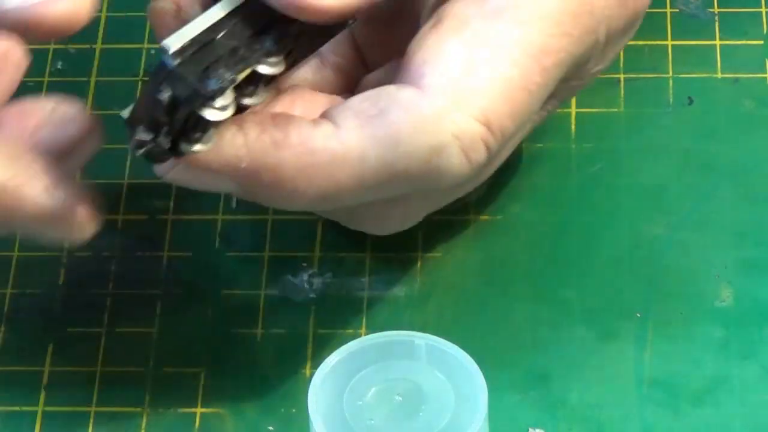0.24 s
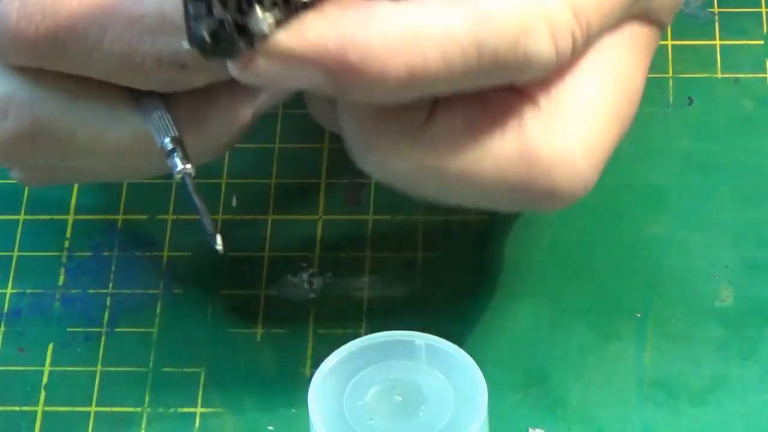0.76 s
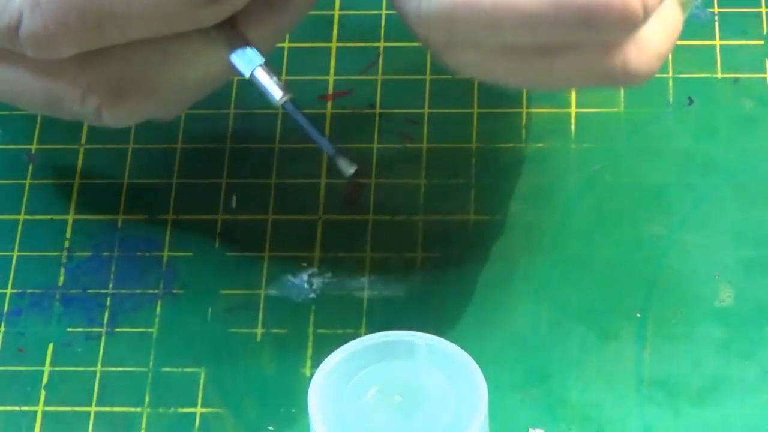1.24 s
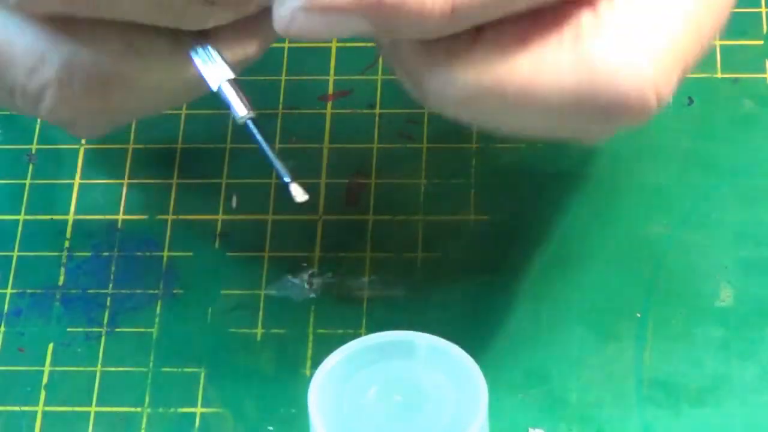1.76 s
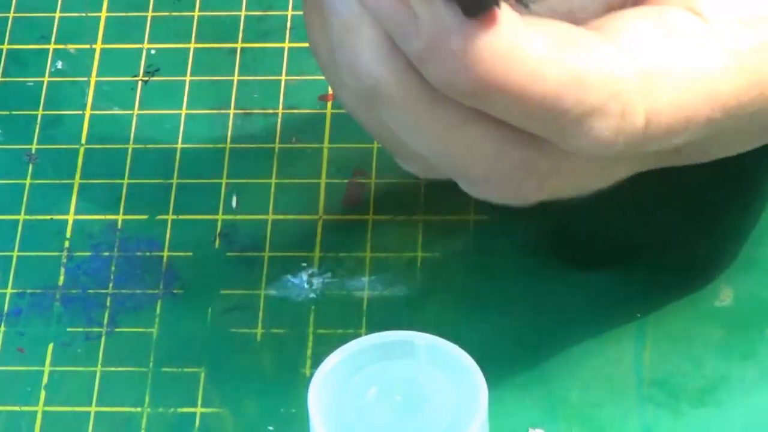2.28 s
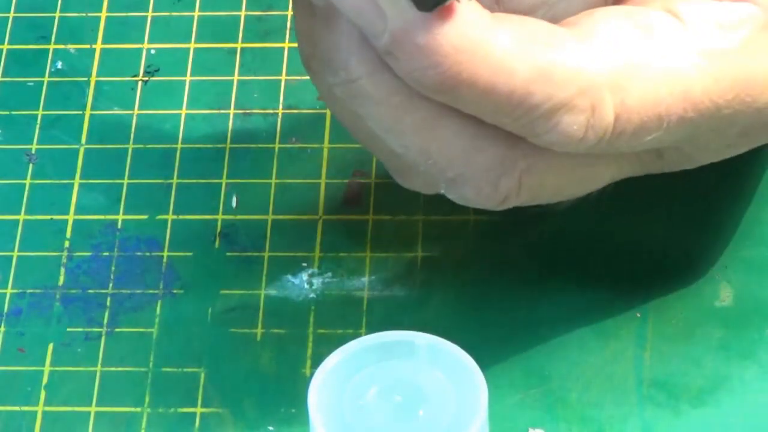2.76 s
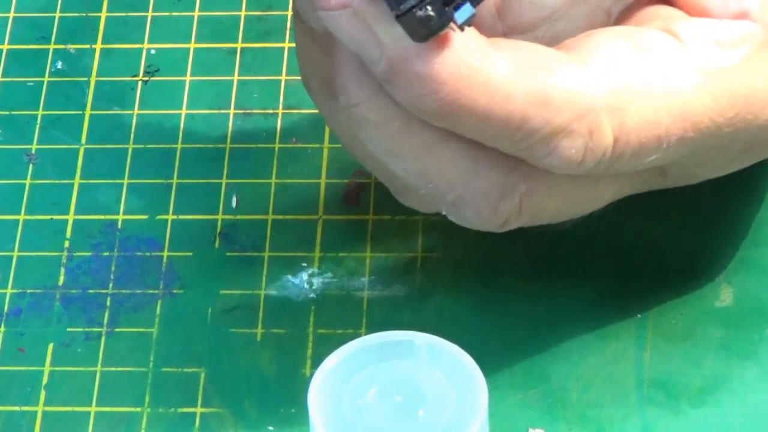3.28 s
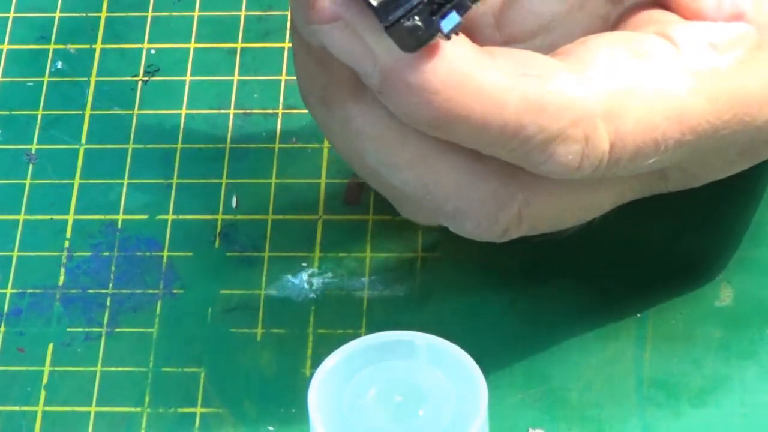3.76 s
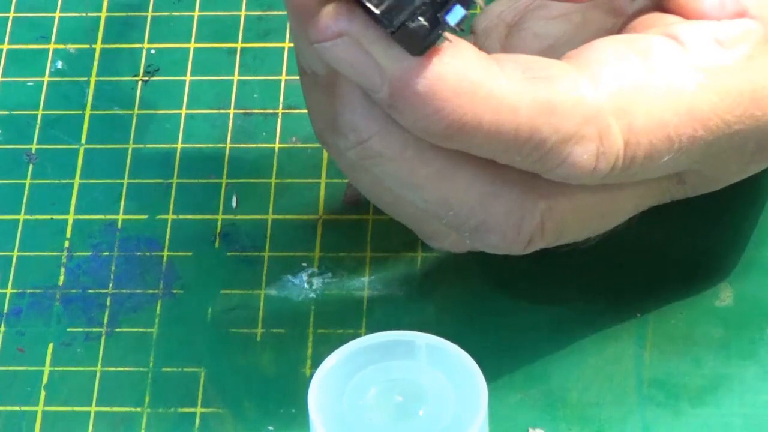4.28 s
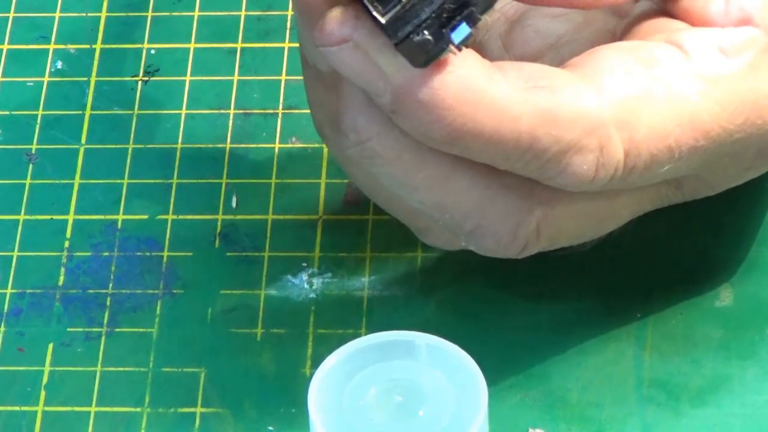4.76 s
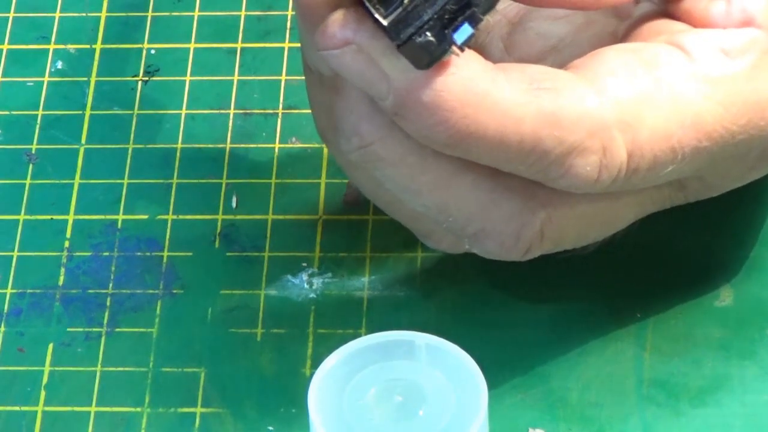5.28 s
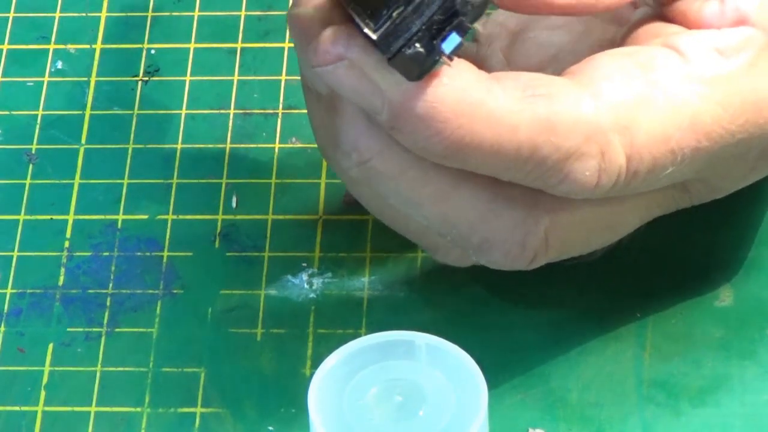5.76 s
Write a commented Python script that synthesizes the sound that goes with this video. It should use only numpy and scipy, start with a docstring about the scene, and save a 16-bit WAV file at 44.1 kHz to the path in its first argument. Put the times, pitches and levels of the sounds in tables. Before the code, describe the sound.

Fingers and a small screwdriver tick and rub on a tiny part over rumbling hiss that stops midway; later a crisp snap and faint clicks.

```python
"""A workbench in a room: fingers turn a small plastic and metal part while a screwdriver tip ticks and snaps on it.
For the first three seconds something rolls on the bench: noise through resonances gives hiss and rumble, and
a low drone beats against the mains hum. Jolts, rubs and slides are bursts of filtered noise, squeaks are wavering
tones, and touches and blade pings ring decaying modes with a short echo.
Mains tones, room hiss and a camera's mechanism, ticking 25 times a second, lie underneath."""
import sys
import numpy as np
from scipy import signal
from scipy.fft import rfft, irfft
from scipy.io import wavfile
from scipy.ndimage import uniform_filter1d

SR = 44100
rng = np.random.default_rng(int(sys.argv[2]) if len(sys.argv) > 2 else 0)


def dump(signal):
    """Clip the signal to [-1, 1] and save it as 16-bit WAV at the path in sys.argv[1]."""
    limited = np.clip(np.atleast_2d(signal).T, -1, 1)
    pcm = np.round(limited * 32767).astype(np.int16)
    wavfile.write(sys.argv[1], SR, pcm)


def volts_from_decibels(level):
    """Turn decibel levels (scalar or array-like) into linear amplitude factors."""
    exponent = np.asarray(level, float) / 20
    return 10 ** exponent


N = 265916

ROLL_END_S = 3.215
# how alike left and right are in the rolling: (frequency [Hz], likeness [0-1])
ROLL_LIKENESS = [(60, 0.98), (180, 1), (550, 0.95), (1650, 0.58), (4970, 0.75), (15000, 1)]
# stereo balance of the rolling: (frequency [Hz], left over right [dB])
ROLL_BALANCE = [(60, 0.5), (180, -0.5), (550, -1.0), (1650, -4.5), (4970, -1.5), (15000, 0.5)]


def rms_one(x):
    """Scale to unit rms."""
    return x / np.sqrt(np.mean(x ** 2) + 1e-20)


def in_time(rows):
    """Turn the columns of a table, after its time column, into sample-rate curves."""
    s, *columns = np.transpose(rows)
    return [np.interp(np.arange(N) / SR, s, column) for column in columns]


def at_hz(points, hz):
    """Read a spectrum along a logarithmic frequency axis."""
    points = np.array(points, float)
    return np.interp(np.log(hz), np.log(points[:, 0]), points[:, 1])


def drift(rate_hz):
    """Slow random curve of unit rms: noise through two equal low-pass poles at rate_hz."""
    # computed at every 40th sample, past the filter's start
    r = np.exp(-80 * np.pi * rate_hz / SR)
    slow = signal.lfilter([1], [1, -2 * r, r * r], rng.standard_normal(N // 40 + 2002))[2000:]
    return np.interp(np.arange(N) / 40, np.arange(len(slow)), rms_one(slow))


def resonate(x, hz, width_hz):
    """Two-pole resonance with a gain of 1 at its top."""
    r = np.exp(-np.pi * width_hz / SR)
    zeros = np.array([1, 0, -1]) * (1 - r * r) / 2
    return signal.lfilter(zeros, [1, -2 * r * np.cos(2 * np.pi * hz / SR), r * r], x)


def pair(white, hz, likeness, balance):
    """Left and right mixed from a shared noise and one of opposite sign in the two channels."""
    alike = np.clip(at_hz(likeness, hz), 0, 1)
    both = np.sqrt(1 + alike) * white[0] + np.sqrt(1 - alike) * white[1] * [[1], [-1]]
    return both * volts_from_decibels(at_hz(balance, hz) * np.array([[.5], [-.5]])) / np.sqrt(1 + alike)


def coloured(spectrum, likeness, balance):
    """Stereo noise shaped bin by bin; the mid has unit rms."""
    hz = np.maximum(np.fft.rfftfreq(N, 1 / SR), 1)
    white = rfft(rng.standard_normal((2, N))) * volts_from_decibels(at_hz(spectrum, hz))
    out = irfft(pair(white, hz, likeness, balance), N)
    return out / np.std(out.mean(axis=0))


def humming(modes, flicker_db, rate_hz):
    """Noise in narrow resonances, each swelling by itself."""
    out = 0
    # the deepest modes grow by 3 dB per second
    growth_db = 3 * (np.arange(N) / SR - ROLL_END_S / 2)
    for hz, width_hz, level_db in modes:
        band = resonate(rng.standard_normal((2, N)), hz, width_hz)
        band = resonate(band, hz, 2 * width_hz)
        band = pair(rms_one(band), hz, ROLL_LIKENESS, ROLL_BALANCE)
        out = out + band * volts_from_decibels(level_db + flicker_db * drift(rate_hz) + growth_db * (hz < 130))
    return out


def rolling():
    """Surface roughness drives a hiss with wheel resonances and a rumble in the bench top, which dies later."""
    # gains while rolling: (time [s], rumble gain [dB], hiss gain [dB])
    roll_gains = [(0.0, -54, -50), (0.52, -47.5, -47.5), (1.12, -49, -48), (1.43, -48.5, -46.5),
                  (1.75, -45.5, -43.5), (2.09, -47, -45), (2.3, -49, -48), (2.6, -53, -47.5),
                  (3.18, -54.5, -51.5)]
    # the two loudest groups of bench modes swell apart:
    # (time [s], lower group gain [dB], upper group gain [dB])
    bench_swell = [(0, -53.5, -51.5), (0.3, -53.5, -56.5), (0.7, -58, -55), (0.85, -59, -49),
                   (1.05, -56.5, -51), (1.3, -56.5, -55), (1.45, -52, -48.5), (1.7, -52, -49.5),
                   (1.85, -59, -47), (2.1, -58.5, -51.5), (2.45, -65, -52), (2.7, -61, -54.5),
                   (3.0, -61, -56), (3.2, -62, -55)]
    # noise spectra: (frequency [Hz], relative level [dB])
    hiss_spectrum = [(410, -11.5), (700, 0.5), (850, -3.5), (1050, 0.5), (1520, -3), (2080, -0.5),
                     (2590, 0.5), (4410, 1.5), (5360, 0), (6340, -1), (9470, -8), (11700, -11.5),
                     (15500, -19)]
    rumble_spectrum = [(35, -26), (60, -4), (75, -13), (145, -3), (277, -2.5), (456, -8.5), (511, -14),
                       (900, -12.5), (1170, -22), (1980, -120)]
    # resonances of bench and wheel: (frequency [Hz], width [Hz], relative level [dB])
    bench_modes = [(73.7, 5.3, -13.5), (104.4, 14.5, -11), (150, 25, -18.5), (379, 24, -15.5),
                   (518, 19, -14), (608, 30, -17), (732, 21, -20)]
    lower_modes = [(199.2, 14.7, -2), (224.6, 27, -8)]
    upper_modes = [(273.4, 18, -3), (312, 22, -6)]
    wheel_modes = [(1060, 51, -19.5), (1405, 15, -21.5), (2070, 110, -18.5), (3237, 40, -18.5),
                   (3550, 220, -14), (3920, 480, -13), (2385, 60, -19), (4420, 150, -14),
                   (6295, 520, -10.5), (6840, 230, -16.5)]
    # phase by which the left leads the right: (frequency [Hz], lead [rad])
    left_lead = [(100, 0.017), (1500, 0.06), (4600, 0.77), (7400, 0.49), (9500, 0.22)]
    hiss_fade_s, rumble_fade_s = 0.02, 0.1   # time constants once the rolling ends

    rumble_db, hiss_db = in_time(roll_gains)
    lower_db, upper_db = in_time(bench_swell)
    after = np.maximum(np.arange(N) / SR - ROLL_END_S, 0)

    hiss = coloured(hiss_spectrum, ROLL_LIKENESS, ROLL_BALANCE) * volts_from_decibels(-2.0 + 1.27 * drift(20.4))
    hiss = volts_from_decibels(hiss_db) * (hiss + humming(wheel_modes, 2.06, 3.7))

    rumble = volts_from_decibels(-7.5) * coloured(rumble_spectrum, ROLL_LIKENESS, ROLL_BALANCE)
    rumble = volts_from_decibels(rumble_db) * (rumble + humming(bench_modes, 1.5, 5.0))
    rumble += volts_from_decibels(lower_db) * humming(lower_modes, .8, 8.0)
    rumble += volts_from_decibels(upper_db) * humming(upper_modes, .8, 8.0)

    out = hiss * np.exp(-after / hiss_fade_s) + rumble * np.exp(-after / rumble_fade_s)
    lead = at_hz(left_lead, np.maximum(np.fft.rfftfreq(N, 1 / SR), 1))
    out[1] = irfft(rfft(out[1]) * np.exp(-1j * lead), N)
    return out


def hum():
    """Mains tones, and a drone that beats just below the first and slides up toward it as it dies."""
    # drone: (time [s], distance below the mains tone [beats per s], rms level [dB])
    drone = [(0, 4.2, -60), (1, 3.6, -62), (2.1, 3.4, -56), (2.5, 2.3, -70), (3.2, 1.3, -55),
             (3.5, 0.69, -112), (6.03, 1.4, -87)]
    # mains tones: (multiple of the mains frequency, rms level [dB])
    mains_tones = [(1, -55), (2, -68)]
    mains_hz, first_beat_s = 50.075, 0.073

    t = np.arange(N) / SR
    beats, drone_db = in_time(drone)
    cycles_behind = np.cumsum(beats) / SR - beats[0] * first_beat_s
    out = volts_from_decibels(drone_db) * np.sin(2 * np.pi * (mains_hz * t - cycles_behind))
    for multiple, level_db in mains_tones:
        out += volts_from_decibels(level_db) * np.sin(2 * np.pi * multiple * mains_hz * t)
    return np.sqrt(2) * out


def room():
    """Steady hiss of air and microphone, with one faint band of noise standing out."""
    # hiss spectrum: (frequency [Hz], relative level [dB])
    hiss_spectrum = [(30, -13), (42, -6.5), (75, -2), (141, -10), (300, -12), (537, -15.5), (955, -20.5),
                     (1450, -20), (1990, -23.5), (2950, -24), (4610, -28), (8000, -30.5), (12000, -29.5),
                     (14600, -29), (15050, -28), (15500, -25)]
    # how alike left and right are: (frequency [Hz], likeness [0-1])
    room_likeness = [(60, 0.97), (150, 0.98), (380, 0.57), (950, 0.08), (2380, 0.28), (5980, 0.77),
                     (15000, 0.8)]
    # faint band: (frequency [Hz], width [Hz], rms level [dB])
    air_band = (1480, 150, -70)
    balance = [(100, 0), (1000, -0.74), (4400, 0.67), (9000, -0.12)]   # (frequency [Hz], left over right [dB])

    hz, width_hz, level_db = air_band
    band = volts_from_decibels(level_db) * rms_one(resonate(rng.standard_normal((2, N)), hz, width_hz))
    return volts_from_decibels(-57.5) * coloured(hiss_spectrum, room_likeness, balance) + band


def camera_ticks():
    """Each tick is a dull knock, then short rings; impulses kick soft-rising resonances, a little unevenly."""
    # parts of a tick: (delay [s], frequency [Hz], level [dB], 60 dB decay [s])
    tick_parts = [(0, 2570, -61.5, 0.0055), (0.0008, 2950, -61.5, 0.008), (0.0027, 3506, -62.5, 0.018),
                  (0.0025, 14300, -72.5, 0.018), (0.0095, 12300, -75, 0.018), (0.0135, 15050, -74, 0.011),
                  (0.025, 15050, -72.5, 0.015)]
    first_s, period_s = .0088, .04
    knock_below_hz, odd_knock_db = 3200, -4   # the knock is softer on every second tick

    starts = np.arange(first_s, N / SR, period_s)
    odd = np.arange(len(starts)) % 2
    out = np.zeros((2, N))
    for delay, hz, level_db, t60 in tick_parts:
        chance = rng.standard_normal((len(starts), 3))
        at = ((starts + delay + .00012 * chance[:, 0]) * SR).astype(int)
        kick_db = level_db + odd_knock_db * (hz < knock_below_hz) * odd
        kick_db = kick_db + 1.1 * (1 + (hz > 9000)) * chance[:, 1]   # the highest rings vary twice as much
        kicks = np.zeros((2, N + SR // 10))
        kicks[:, at] = volts_from_decibels(kick_db + .5 * chance[:, 2] * [[1], [-1]])
        width_hz = np.log(1000) / np.pi / t60
        # a wider resonance first softens the rise
        kicks = resonate(kicks + 1e-18, hz, 2.3 * width_hz) * SR / (3.0 * np.pi * width_hz)
        out += resonate(kicks, hz, width_hz)[:, :N] * 5.85
    return out


def scuffs(rows, octaves, rise=0.19):
    """Bursts of noise round a centre pitch, grainy as the contact catches and slips; rise is a share of length."""
    grain_s, grain_db = 0.0011, 3.5
    top_hz = 8700   # bursts centred high may reach past it
    t = np.arange(round(.2 * SR)) / SR
    out = np.zeros((2, N))
    for s, level_db, hz, length in rows:
        fade = 0.95 * np.exp(-(t / length) ** 3.1) + 0.13 * np.exp(-t / 0.069)
        shape = np.minimum(t / (rise * length), 1) * fade

        grain = rms_one(uniform_filter1d(rng.standard_normal(len(t)), round(grain_s * SR)))
        mid, side = rng.standard_normal((2, len(t))) * volts_from_decibels(grain_db * grain)
        stereo = mid + 0.38 * signal.lfilter([.3], [1, -.7], side) * [[1], [-1]]

        low_hz = hz / 2 ** (octaves / 2)
        high_hz = min(hz * 2 ** (octaves / 2), max(top_hz, 1.3 * hz))
        edges = np.clip([low_hz, high_hz], 30, .45 * SR)
        burst = signal.sosfilt(signal.butter(2, edges, "band", fs=SR, output="sos"), stereo)

        i = round((s - .002) * SR)
        out[:, i:i + len(t)] += (volts_from_decibels(level_db - 7.5) * rms_one(burst) * shape)[:, :N - i]
    return out


def jolts():
    """The rolling thing jolts, fingers brush the part: broad bursts, with a duller thump from the wood under each."""
    # (time [s], burst level [dB], centre [Hz], length [s], thump level [dB])
    jolt_rows = [(0.497, -36, 4860, 0.043, -55), (0.816, -37.5, 2300, 0.026, -45),
                 (0.915, -41, 5900, .019, -62), (1.124, -35, 3820, 0.042, -38.5),
                 (1.313, -46, 5020, 0.048, -62), (1.494, -38.5, 4430, .03, -53),
                 (1.669, -33.5, 4500, 0.028, -41), (1.971, -37, 6000, 0.046, -62),
                 (2.012, -35, 6420, 0.034, -37), (2.256, -39, 4500, 0.019, -62),
                 (2.3, -39.5, 2520, 0.014, -35.5), (2.781, -41.5, 2300, 0.026, -49),
                 (3.082, -40.5, 3480, 0.025, -64), (3.383, -51.5, 6460, 0.044, -50),
                 (4.222, -40, 4500, 0.014, -70), (4.244, -56, 3000, 0.039, -53),
                 (4.328, -51.5, 6400, 0.063, -75)]
    thump_hz = 474
    bursts = [(s, level_db, hz, length) for s, level_db, hz, length, _ in jolt_rows]
    thumps = [(s, thump_db, thump_hz, length) for s, _, _, length, thump_db in jolt_rows]
    return scuffs(bursts, octaves=2.5) + scuffs(thumps, octaves=2.13)


def clicks():
    """Screwdriver and part touch: each touch strikes the modes near its brightest pitch hardest, with a noisy crack."""
    # touches: (time [s], peak level [dB], brightest pitch [Hz], spread [octaves], left over right [dB])
    touches = [(0.497, -32, 6500, .8, 2), (0.4992, -37, 7500, .5, 2), (0.5003, -30, 7700, 0.25, 2),
               (0.5005, -40, 4300, .3, 2), (1.13, -36, 6800, .3, 0), (1.132, -33, 2800, .2, -2),
               (1.387, -26.5, 8850, 0.36, 2), (1.67, -39, 5000, 1.4, 0), (1.674, -39, 6800, .3, 0),
               (1.6845, -34, 5250, .4, 0), (2.017, -35, 8000, .2, 6), (2.072, -31, 11600, 0.29, 6),
               (2.117, -33, 8000, 0.82, 3), (2.864, -33, 8000, 0.59, 5), (3.2947, -35.5, 9500, 1.1, 2),
               (3.301, -44, 10000, 1.0, 3), (3.379, -49, 5300, .4, 0), (3.394, -47, 5200, .4, 0),
               (3.404, -48, 6200, .4, 0), (3.3865, -41, 6560, 0.4, 2), (3.3885, -46, 8400, .3, 0),
               (3.5413, -30, 7500, 1.1, 2.5), (3.544, -37, 6500, 1.6, 2), (3.5485, -44, 9000, .5, 5),
               (3.572, -52, 2800, 0.12, 2), (3.58, -58, 2800, .12, 2), (4.202, -40, 5460, 1.6, .5),
               (4.221, -47, 6900, 0.27, 0), (4.2235, -41, 4300, .5, 0), (4.2262, -36, 4600, 1.1, 0),
               (4.2265, -41, 10000, .3, 0), (4.2293, -35, 3300, 1.0, 0), (4.2372, -38, 7000, 1.2, -3),
               (4.2386, -27, 7000, 1.5, -3), (4.2435, -16.5, 7000, 0.77, 3),
               (4.2434, -23.5, 2100, 1.45, -1), (4.2465, -34, 4000, 1.8, 1), (4.2485, -37, 1900, .8, 0),
               (4.25, -36, 6500, 1.2, 1), (4.256, -43, 2000, 0.37, 0), (4.258, -43, 6500, .5, 1),
               (4.266, -46, 2000, .4, 0), (4.275, -43, 6800, .6, 1), (4.288, -46, 2800, .8, 1),
               (4.5204, -50, 2980, .3, 1), (4.712, -43, 7040, 1.4, -.5), (4.7125, -51, 1970, .3, -.5),
               (5.056, -51, 8300, 0.12, 0), (5.057, -56, 5250, .15, 0), (5.083, -45.5, 8250, 0.15, 3),
               (5.113, -52, 7300, .3, 0), (5.379, -53, 9800, .15, 0), (5.392, -47, 8200, .2, -3),
               (5.548, -54, 8200, 0.15, 0)]
    # modes of the part: (frequency [Hz], relative level [dB], 60 dB decay [s])
    part_modes = [(380, -8, .025), (563, -8, 0.018), (810, -3, 0.017), (1150, -7.5, 0.023),
                  (1340, -8, 0.012), (1610, -6.5, 0.018), (2020, -3, 0.022), (2300, -4, 0.011),
                  (2800, -2.5, 0.013), (3270, -7, 0.0098), (3960, -0.5, 0.0086), (4500, -9, 0.018),
                  (5250, -17, .008), (6200, -1, 0.0093), (6830, 2, 0.0078), (7700, -3, 0.0031),
                  (8220, 0.5, 0.009), (8700, -2.5, 0.0084), (9800, 0.5, 0.01), (10450, 0.5, 0.0066),
                  (12100, -8, 0.0087), (13300, -2, 0.0059)]
    crack_db, crack_t60_s = -5, 0.0088

    t = np.arange(round(.15 * SR)) / SR
    out = np.zeros((2, N))
    hz, level_db, t60 = np.transpose(part_modes)[:, :, None]
    for s, peak_db, bright_hz, octaves, pan_db in touches:
        luck = rng.standard_normal((len(part_modes), 2))
        near_db = -6.0 * (np.log2(hz / bright_hz) / max(octaves, .05)) ** 2
        decay = volts_from_decibels(level_db + near_db + 1.5 * luck[:, :1] - 60 * t / t60)
        modes = decay * np.sin(2 * np.pi * hz * t + 1.7 * luck[:, 1:])
        ring = (modes * np.minimum(t * hz / 1.16, 1)).sum(axis=0)   # each mode builds up over about a cycle

        edges = np.clip([bright_hz / 2 ** (1.07 * octaves), bright_hz * 2 ** (0.34 * octaves)], 30, 14000)
        noise = rng.standard_normal(len(t)) * volts_from_decibels(-60 * t / crack_t60_s)
        crack = signal.sosfilt(signal.butter(2, edges, "band", fs=SR, output="sos"), noise)

        touch = ring / abs(ring).max() + volts_from_decibels(crack_db) * crack / abs(crack).max()
        gain = volts_from_decibels(peak_db + pan_db * np.array([[.5], [-.5]]))
        i = round(s * SR)
        out[:, i:i + len(t)] += (gain * touch / abs(touch).max())[:, :N - i]
    return out


def echoed(struck):
    """Bench and hands return a short echo: the sound is convolved with decaying, low-passed noise."""
    length_s, echo_db, t60_s, top_hz = .15, -9.5, 0.12, 7000
    t = np.arange(round(length_s * SR)) / SR
    shared, own = rng.standard_normal(len(t)), rng.standard_normal((2, len(t)))
    echo = shared + 1.2 * signal.lfilter([.3], [1, -.7], own)
    echo = echo * volts_from_decibels(-60 * t / t60_s) * np.minimum(t / 0.0021, 1)
    echo = signal.sosfilt(signal.butter(2, top_hz, fs=SR, output="sos"), echo)
    echo *= volts_from_decibels(echo_db) / np.sqrt((echo ** 2).sum(axis=1, keepdims=True))
    return struck + signal.fftconvolve(struck, echo, axes=1)[:, :N]


def rubs():
    """Squeaky rubs on one pitch: noise bursts in a very narrow band."""
    # (time [s], level [dB], pitch [Hz], length [s])
    rub_rows = [(1.745, -40.5, 6400, 0.042), (4.334, -52, 8140, 0.043), (4.334, -57, 9800, .035),
                (2.6, -45, 2100, .022), (2.146, -41, 2480, .022)]
    return scuffs(rub_rows, octaves=0.12)


def squeaks():
    """Stick-slip squeaks: a wavering tone whose pitch sags in the middle of the slip."""
    # (time [s], level [dB], pitch [Hz], length [s], dip of the pitch midway [Hz])
    squeak_rows = [(1.823, -48.5, 2070, 0.064, 20), (2.007, -40, 2280, .027, 216),
                   (2.049, -43, 2170, .011, 50)]
    wander_hz, flutter_db = 50, 3.5
    out = np.zeros(N)
    for s, level_db, hz, length, dip_hz in squeak_rows:
        t = np.arange(round(length * SR)) / SR
        arch = np.sin(np.pi * t / length)
        noises = rng.standard_normal((2, len(t)))
        wander, flutter = [rms_one(uniform_filter1d(noise, size=110)) for noise in noises]
        phase = 2 * np.pi * np.cumsum(hz - dip_hz * arch + wander_hz * wander) / SR
        i = round(s * SR)
        out[i:i + len(t)] += volts_from_decibels(level_db + flutter_db * flutter) * arch ** 0.42 * np.sin(phase)
    return out * volts_from_decibels([[-1.5], [1.5]])   # leans to the right


def pings():
    """The steel blade is tapped: each tap sets its few high modes ringing."""
    # taps: (time [s], peak level [dB], left over right [dB])
    taps = [(2.2236, -28, 0), (2.2296, -30, 3), (2.353, -51, 0), (2.431, -38, 0), (2.439, -39, 5)]
    # modes of the blade: (frequency [Hz], relative level [dB], 60 dB decay [s])
    blade_modes = [(6000, -8.5, 0.014), (10470, -4, 0.0046), (11740, 1, 0.0093), (13500, -10, .005),
                   (15000, -16, .004)]
    t = np.arange(round(.05 * SR)) / SR
    out = np.zeros((2, N))
    hz, level_db, t60 = np.transpose(blade_modes)[:, :, None]
    for s, peak_db, pan_db in taps:
        luck_db = 1.5 * rng.standard_normal((len(blade_modes), 1))
        modes = volts_from_decibels(level_db + luck_db - 60 * t / t60) * np.sin(2 * np.pi * hz * t)
        ring = modes.sum(axis=0) * np.minimum(t / 0.00083, 1)
        i = round(s * SR)
        gain = volts_from_decibels(peak_db + pan_db * np.array([[.5], [-.5]]))
        out[:, i:i + len(t)] += gain * ring / abs(ring).max()
    return out


def slides():
    """A fingertip slides over the part: noise bursts that swell more slowly."""
    # (time [s], level [dB], centre [Hz], length [s])
    slide_rows = [(3.372, -47, 7200, 0.024), (3.385, -47.5, 5600, 0.028)]
    return scuffs(slide_rows, octaves=0.71, rise=0.4)


def scene():
    """All sources in stereo; touches and pings share one echo."""
    steady = rolling() + hum() + room() + camera_ticks()
    rubbed = jolts() + rubs() + squeaks() + slides()
    return steady + rubbed + echoed(clicks() + pings())


def top_cut(x):
    """Nothing passes above the cut-off."""
    return signal.sosfilt(signal.butter(12, 15960, fs=SR, output="sos"), x)


def record(dry):
    """A steep low-pass cuts the top of the finished mix."""
    low_pass = signal.ellip(10, 1, 60, 15700, fs=SR, output="sos")   # 1 dB ripple, 60 dB stop, cutoff in Hz
    mix = signal.sosfilt(low_pass, dry)
    return top_cut(mix)


dry = scene()
out = record(dry)
dump(out)
```